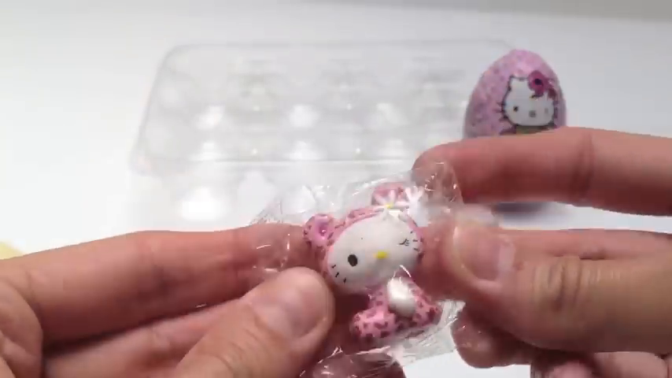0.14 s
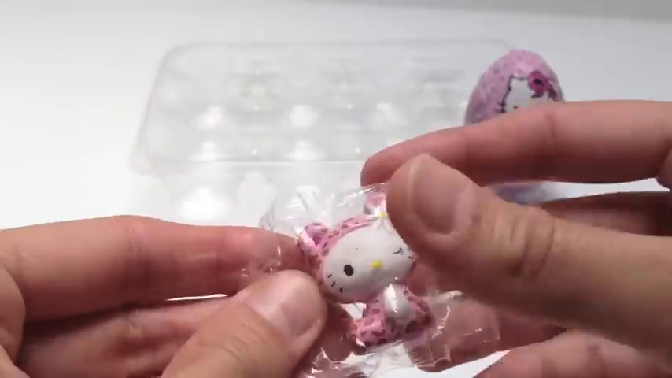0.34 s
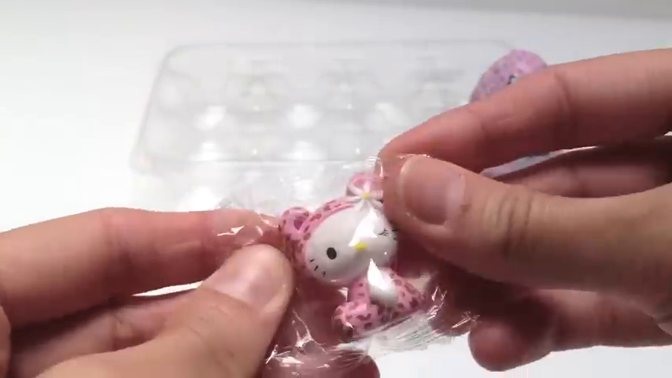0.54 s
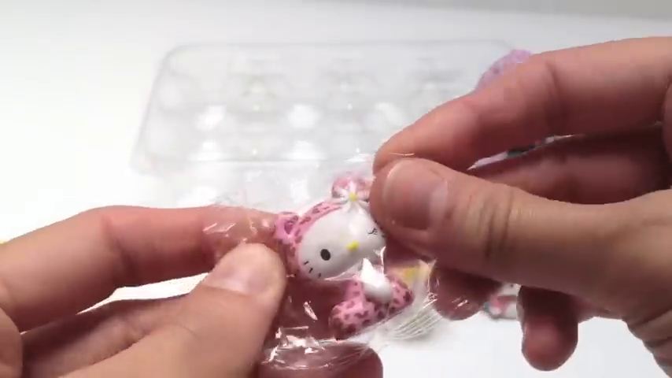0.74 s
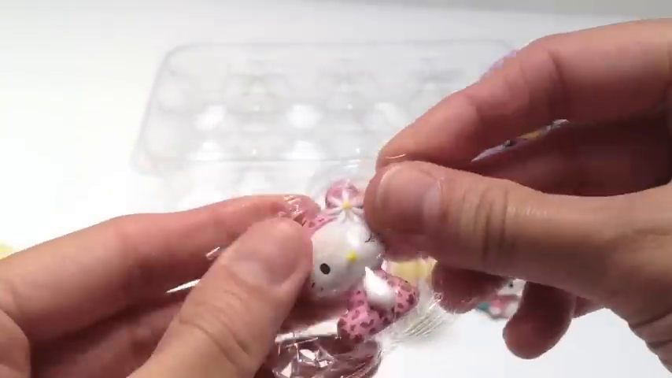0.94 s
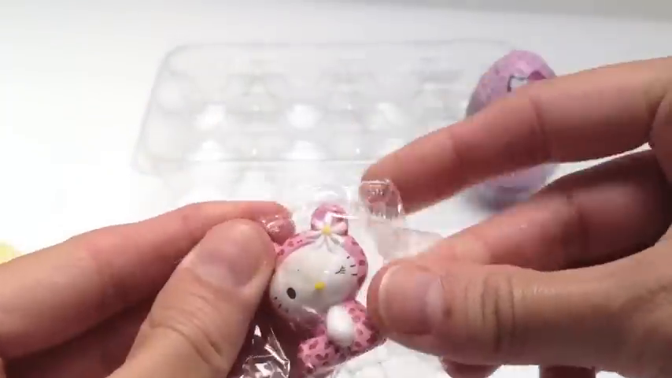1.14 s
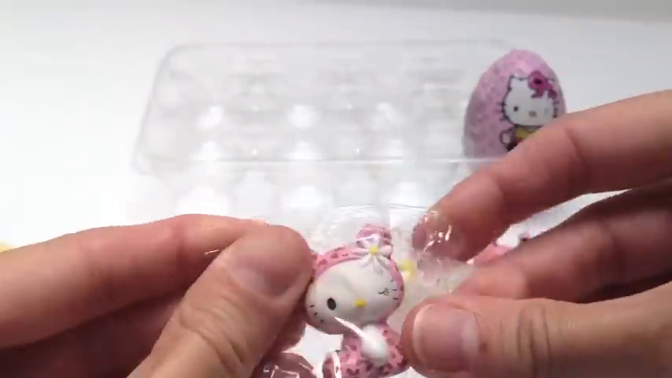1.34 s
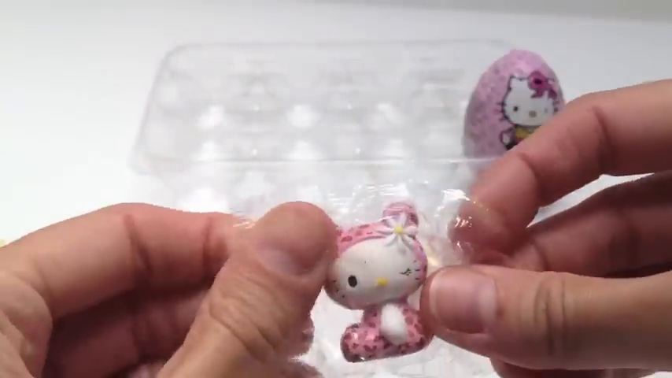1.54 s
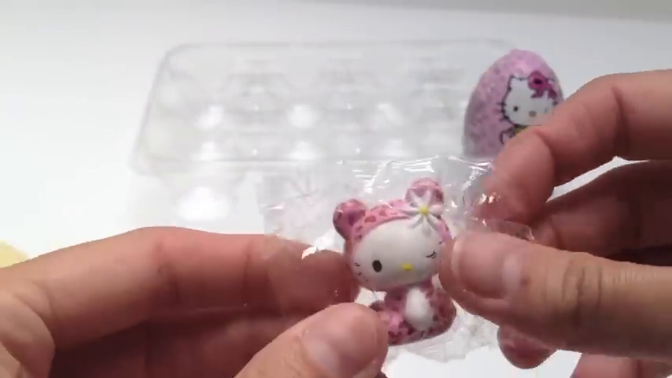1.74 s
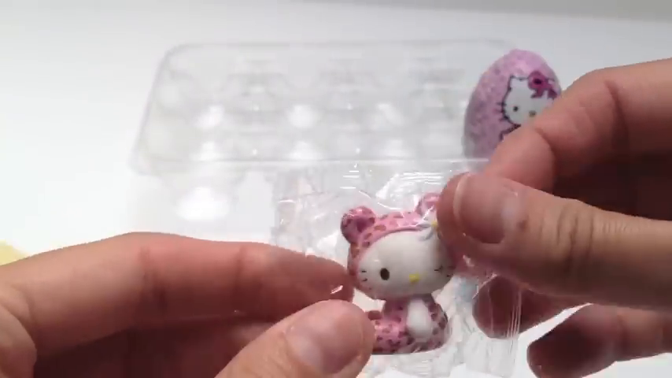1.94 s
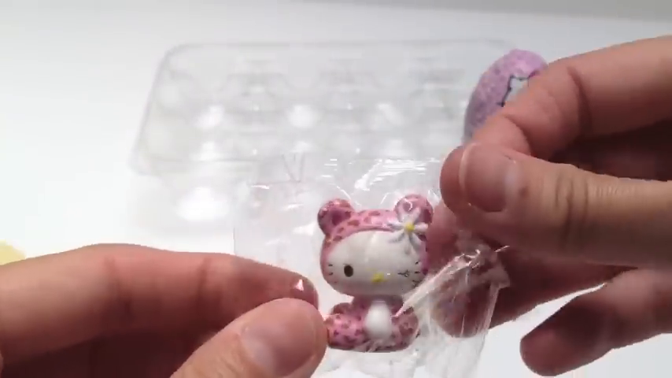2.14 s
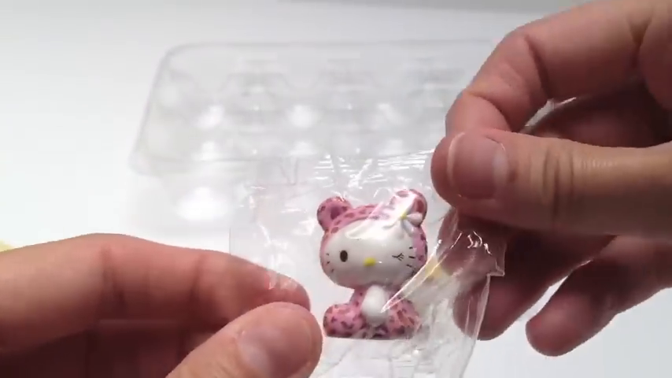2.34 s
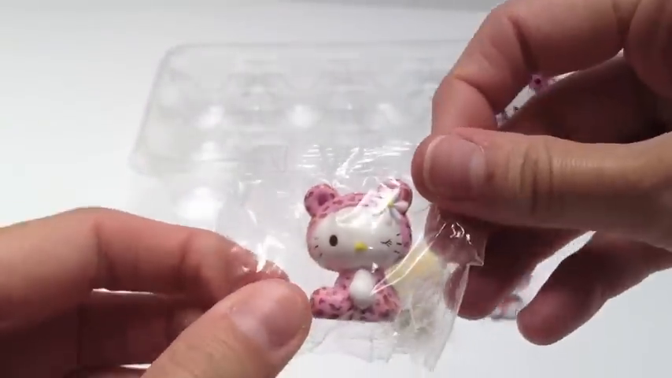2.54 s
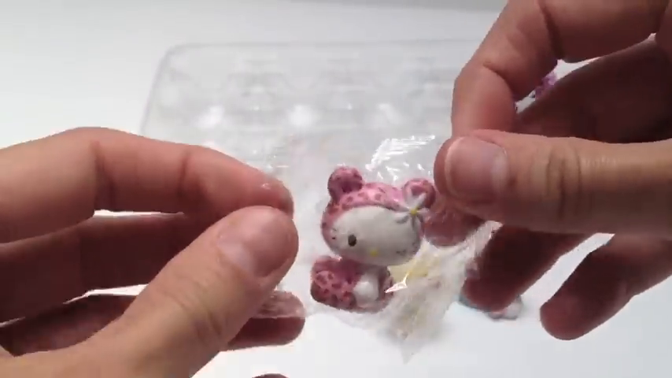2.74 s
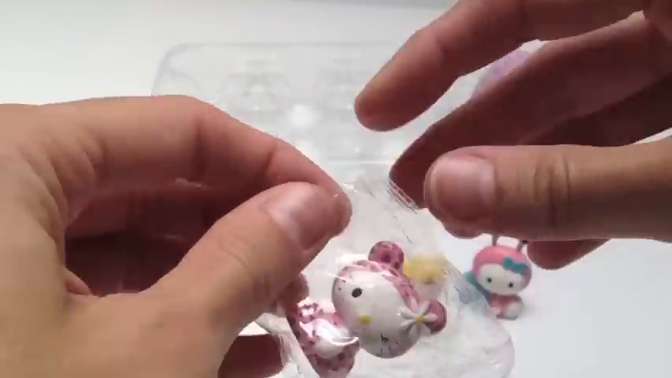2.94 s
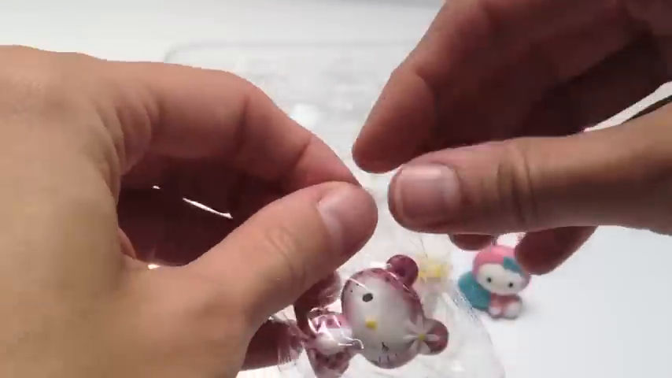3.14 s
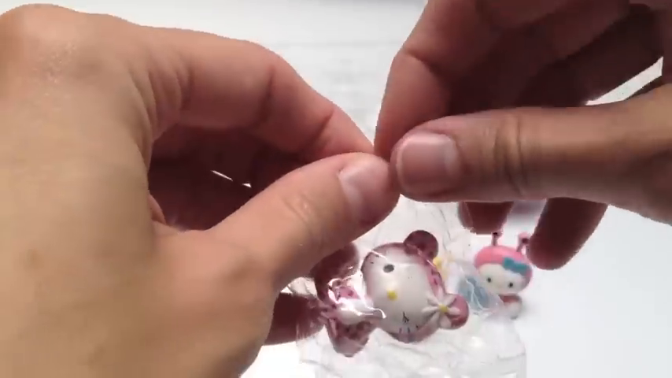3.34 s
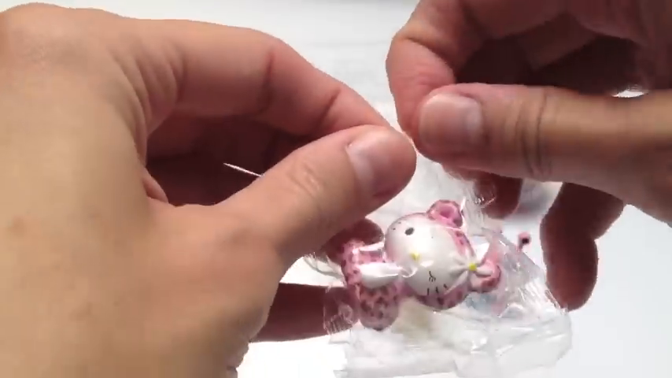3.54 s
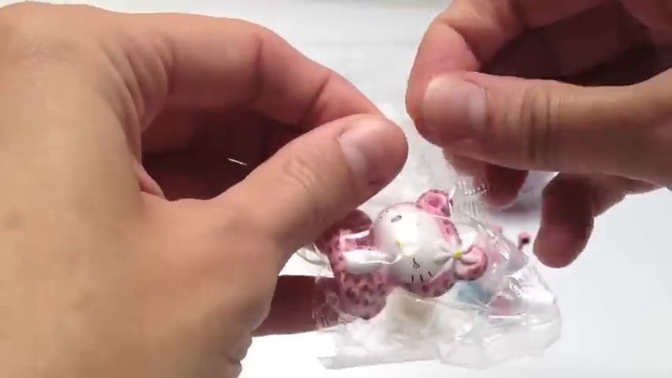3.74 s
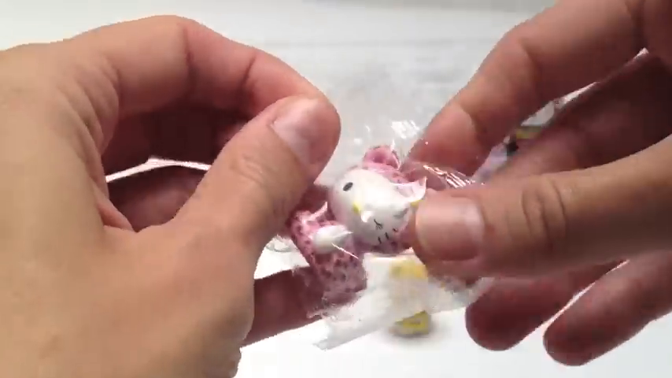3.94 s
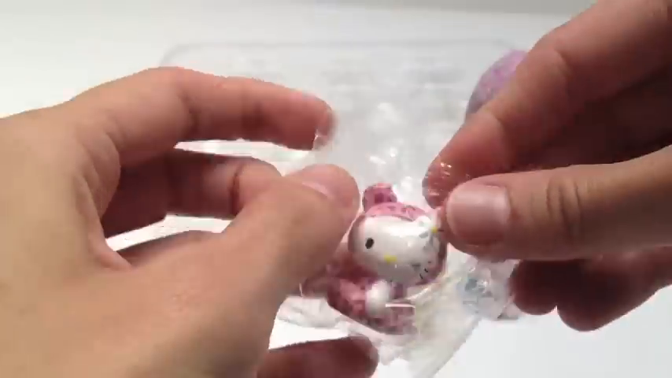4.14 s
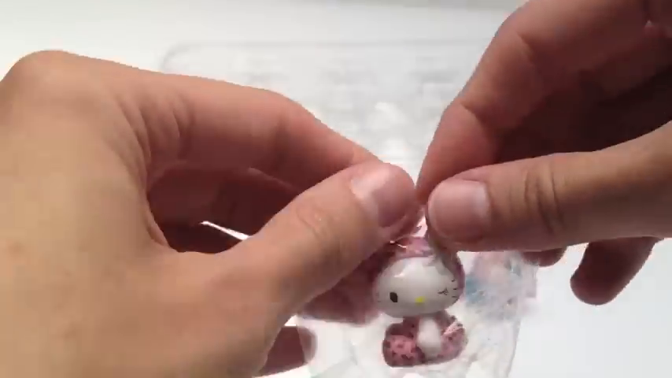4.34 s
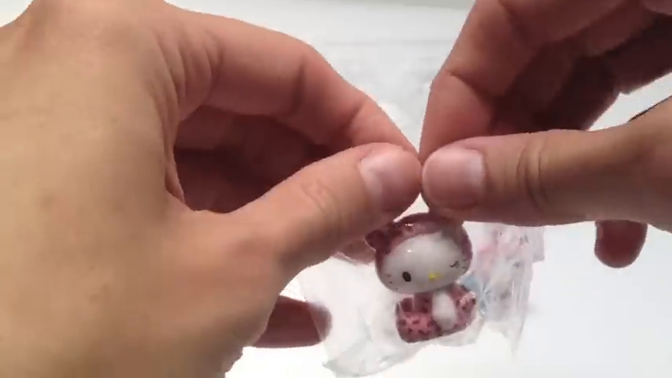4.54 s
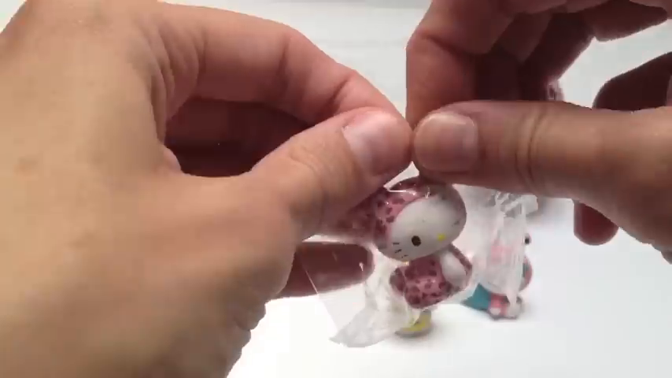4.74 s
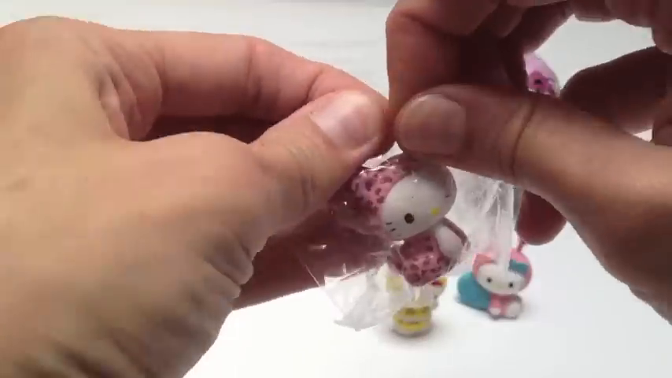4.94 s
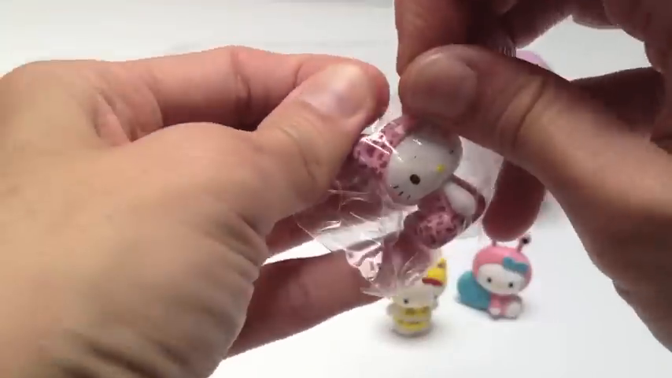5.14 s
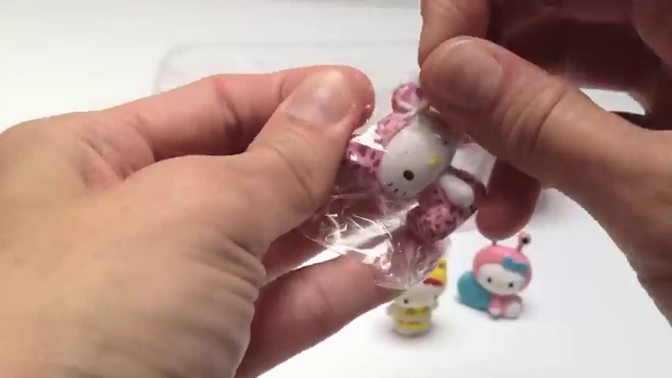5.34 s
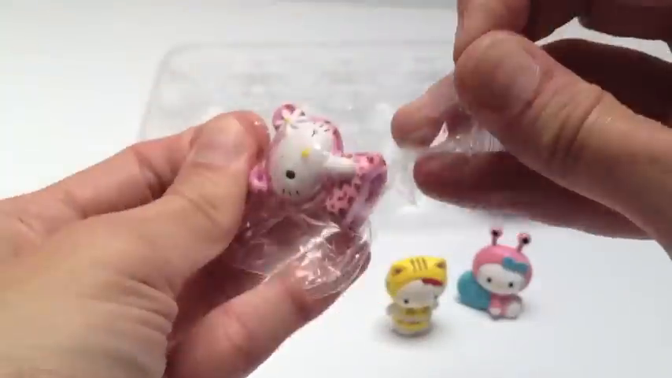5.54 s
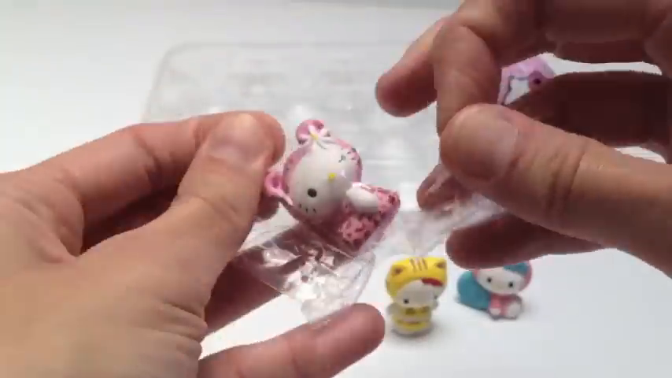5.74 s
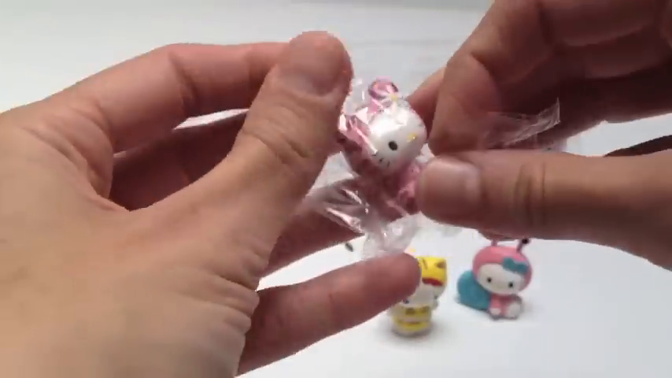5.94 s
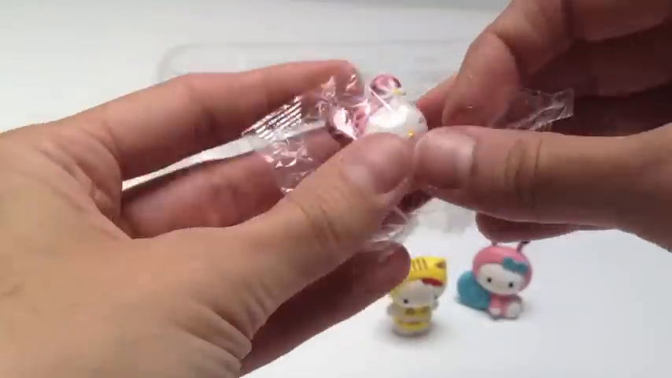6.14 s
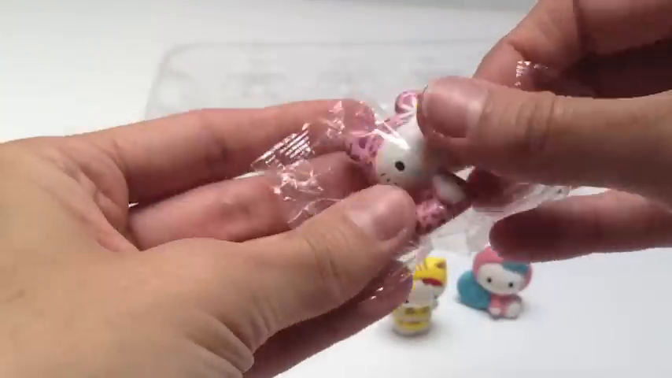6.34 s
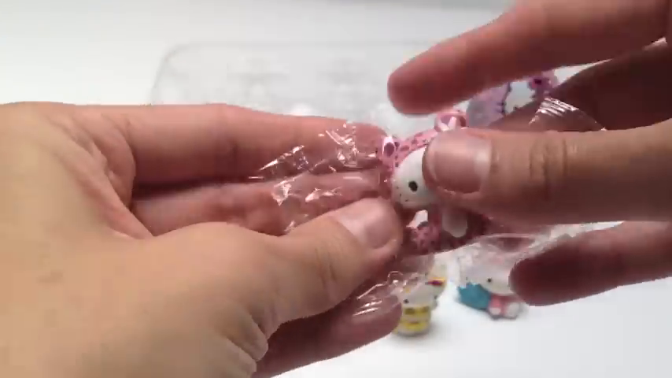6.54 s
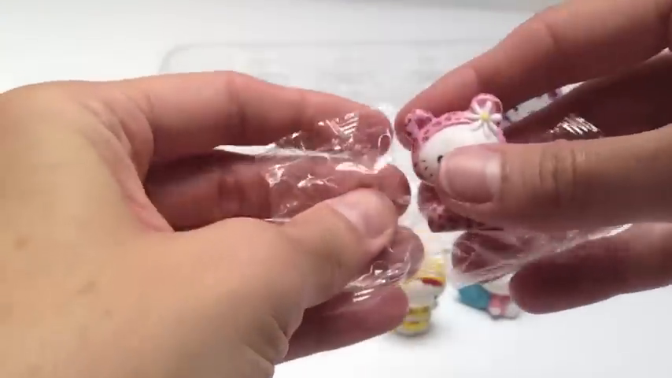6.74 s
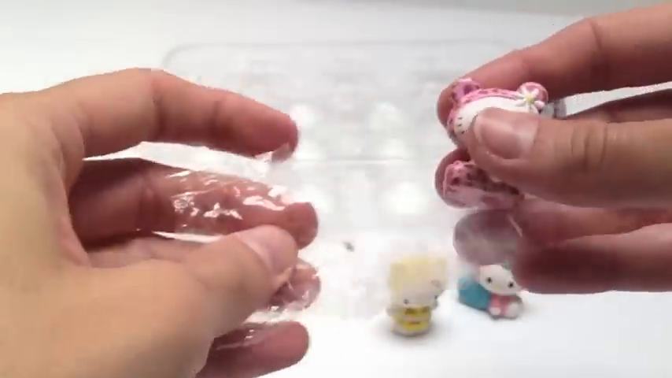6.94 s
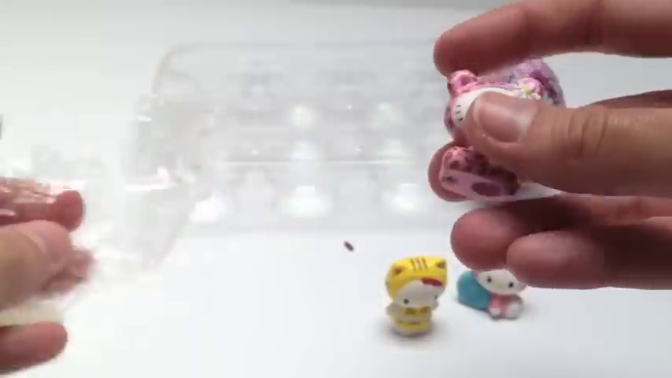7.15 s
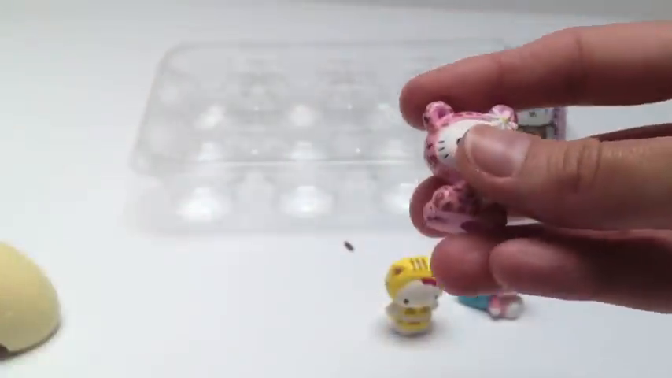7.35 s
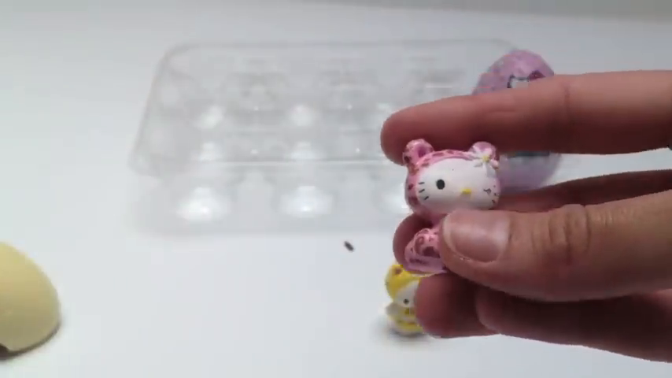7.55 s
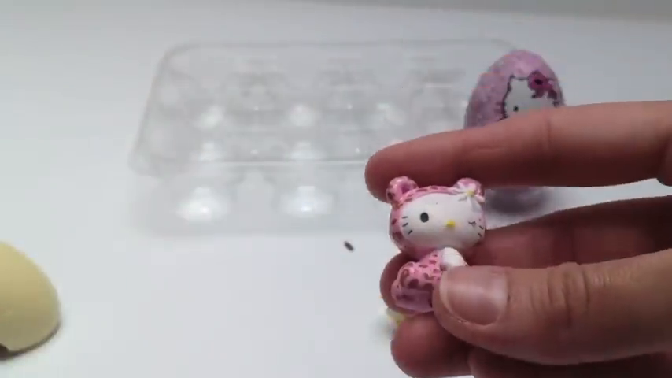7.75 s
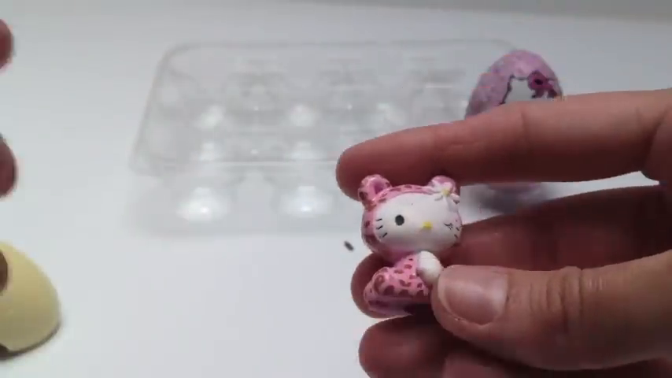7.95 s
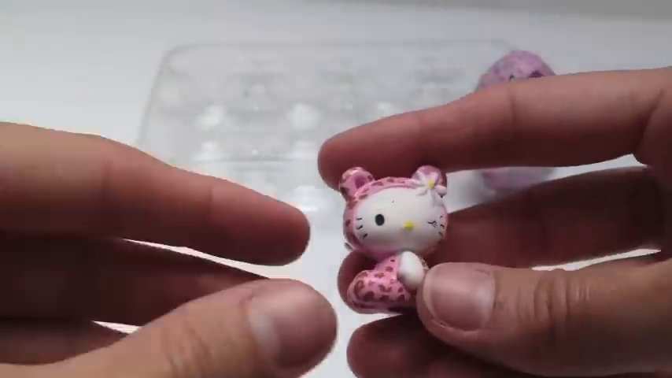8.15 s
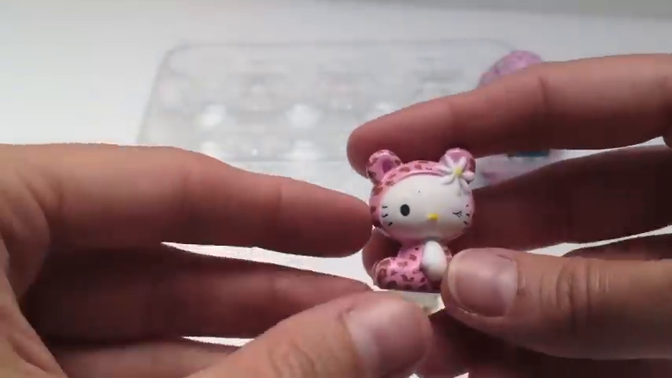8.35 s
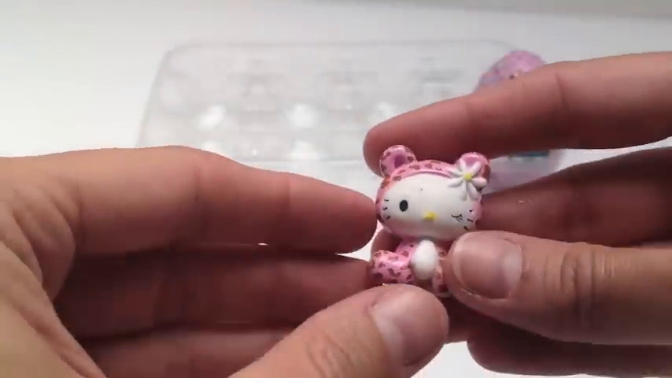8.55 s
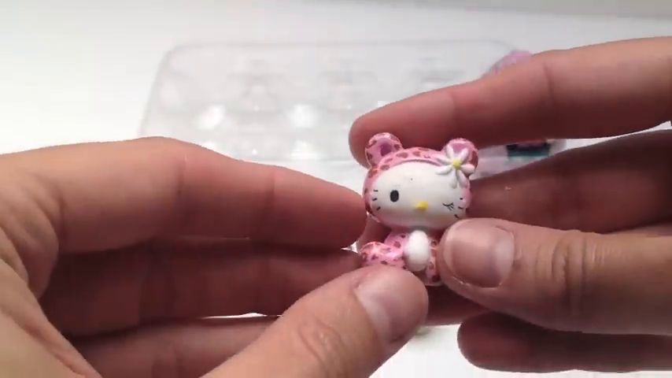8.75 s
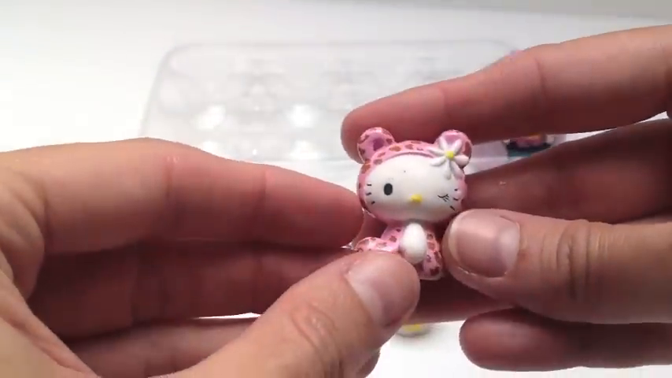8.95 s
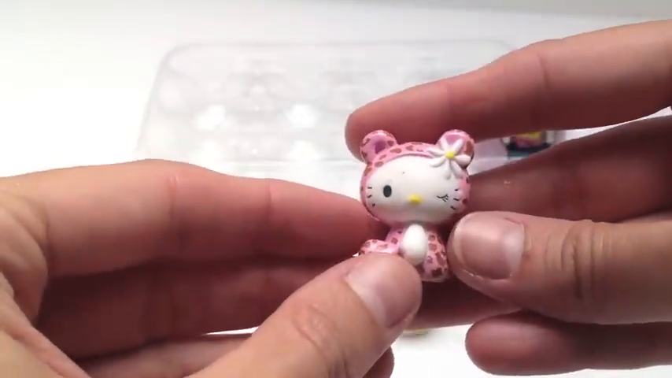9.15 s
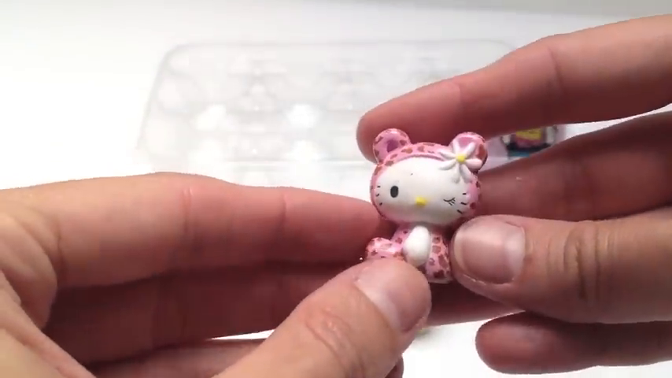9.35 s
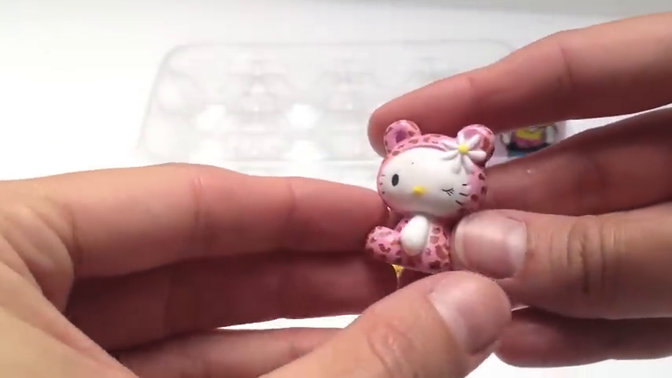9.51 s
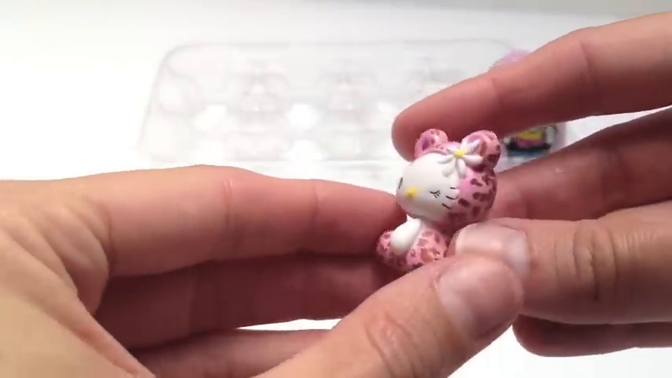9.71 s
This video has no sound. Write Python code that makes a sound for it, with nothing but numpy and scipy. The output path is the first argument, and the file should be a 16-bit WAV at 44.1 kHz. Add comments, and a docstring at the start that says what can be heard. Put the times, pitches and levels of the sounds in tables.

```python
"""A low wavering hum, hiss and faint whistle fill a quiet room throughout, as filtered noise and a sine.
From the start, fingers tear open a thin clear plastic bag around a small figure, close to a microphone.
Film creases, as struck resonances, make a dense fine crackle with noise rustle, and sharp snaps over it.
From 7.6 s the dropped bag brushes the table in soft scuffs of fading noise; the room sound remains."""
import sys
import numpy as np
from scipy import signal
from scipy.fft import rfft, irfft
from scipy.io import wavfile

SR = 44100
rng = np.random.default_rng(int(sys.argv[2]) if len(sys.argv) > 2 else 0)


def unload_audio(sound):
    """Save the sound as a 16-bit wav file, at the path given as the first command line argument."""
    columns = np.transpose(np.atleast_2d(sound))
    # keep every value between -1 and 1, then stretch to whole-number steps
    steps = np.round(np.clip(columns, -1, 1) * 32767)
    wavfile.write(sys.argv[1], SR, steps.astype(np.int16))


N = 435708

# Steady fumbling of the fingers on the film. Each row: time in seconds, crackle level in dB.
HANDLING = [(0.0, -51.5), (0.37, -64), (0.9, -53.5), (1.1, -51), (1.9, -48), (2.43, -53.5), (2.53, -68.5),
            (3.28, -65.5), (3.8, -56), (4.43, -65), (4.75, -52), (6.05, -57.5), (6.67, -59), (7.04, -53),
            (7.1, -71.5), (7.603, -69)]
# Film as the microphone colours it. Each row: frequency in Hz, gain in dB.
FILM = [(180, -54.5), (500, -16.5), (720, -5), (1400, -5.5), (1800, -2.5), (3500, -3), (5400, -8.5),
        (7600, -3.5), (9400, -12), (11500, -3), (14300, -1)]

SIZE = 512  # samples per crease
CRACKLE_PER_S = 350
LENGTH_SPREAD, TREBLE_SPREAD_DB = 0.4, 4  # how much creases differ: log of duration, treble in dB


def undb(db):
    """Amplitude ratio from decibels: 20 dB is a factor of ten."""
    return 10 ** (np.asarray(db) / 20)


def level(x, db):
    """Scale a signal to an RMS level in dB."""
    return x * undb(db) / np.sqrt(np.mean(x ** 2))


def spectrum(table, size):
    """Transfer-function magnitude: a (Hz, dB) table interpolated over log frequency on transform bins."""
    hz, db = np.transpose(table)
    bins_hz = np.fft.rfftfreq(size, 1 / SR) + 1
    return undb(np.interp(np.log(bins_hz), np.log(hz), db))


def causal(gain):
    """Minimum phase by the folded cepstrum: the filter rings only after it is struck."""
    cepstrum = irfft(np.log(gain))
    half = len(cepstrum) // 2
    folded = np.r_[cepstrum[0], 2 * cepstrum[1:half], cepstrum[half], np.zeros(half - 1)]
    return np.exp(rfft(folded))


def curve(table, t):
    """Linear interpolation of each column against the times in the first."""
    s, *columns = np.transpose(table)
    return [np.interp(t, s, column) for column in columns]


def halves(f):
    """Band splitting: the microphone's treble dip parts the sound into body and sizzle."""
    body_gain = 1 / (1 + (f / 9000) ** 10)
    sizzle_gain = 1 / (1 + (10800 / f) ** 10)
    return body_gain, sizzle_gain


def room():
    """Stationary noise and narrow bands superpose with a pure tone; a slow gain swells the bass."""
    # Hiss spectrum. Each row: frequency in Hz, relative density in dB per Hz.
    hiss_colour = [(90, -32), (122, -13), (235, -9), (340, -10), (590, -20), (1000, -15.5), (1400, -20.5),
                   (1750, -18), (2100, -25), (6000, -30.5), (9600, -37.5), (11500, -35.5), (14000, -27)]
    # Wavering hum. Each row: centre in Hz, width at half amplitude in Hz, level before the swell in dB.
    hum_bands = [(207.6, 7.3, -78.5), (239.5, 14, -72), (337.9, 9, -78.5)]
    # Thin steady tone. Each row: frequency in Hz, RMS level in dB.
    whistle = [(11601, -90)]
    # Low room sound swelling while arms move. Each row: time in seconds, gain in dB.
    rumble = [(0, 0.5), (3.8, 1), (4.6, 7.5), (5.4, 4), (7.8, 2.5), (8.2, -1.5)]

    t, f = np.arange(N) / SR, np.fft.rfftfreq(N, 1 / SR)
    hiss = irfft(rfft(rng.standard_normal(N)) * spectrum(hiss_colour, N), N)
    noise = rfft(level(hiss, -65))  # dB before the swell
    for hz, width_hz, db in hum_bands:
        band = rfft(rng.standard_normal(N)) / (1 + (2 * (f - hz) / width_hz) ** 2)
        noise = noise + rfft(level(irfft(band, N), db))
    low = 1 / (1 + (f / 260) ** 4)
    swell = undb(curve(rumble, t)[0])
    tones = sum(undb(db) * np.sqrt(2) * np.sin(2 * np.pi * hz * t) for hz, db in whistle)
    return irfft(noise * low, N) * swell + irfft(noise * (1 - low), N) + tones


def buckle(ring_hz, treble_db, q=3.5, skirt_db=-10, shiver_ms=1.0):
    """Impulse-excited resonance, a row per crease: a jolt and short shiver ring the film; body peak 1."""
    t = np.arange(SIZE) / SR
    chance = rng.standard_normal((len(ring_hz), SIZE + 1))
    decay_s = shiver_ms / 1000 * np.exp(LENGTH_SPREAD * chance[:, -1:])
    push = chance[:, :SIZE] * np.exp(-t / decay_s)
    push[:, 0] += 3 * np.sign(push[:, 0])  # first blow against the shiver
    sound = rfft(push) * causal(spectrum(FILM, SIZE))

    f = np.fft.rfftfreq(SIZE, 1 / SR) + 1
    body_gain, sizzle_gain = halves(f)
    ratio = f / ring_hz[:, None]
    resonance = 1 / (1 + 1j * q * (ratio - 1 / ratio))
    skirt = undb(skirt_db + 0.14 * np.minimum(treble_db, 0))[:, None]  # dull creases ring purer
    body = irfft(sound * body_gain * (resonance + skirt))
    sizzle = irfft(sound * sizzle_gain)
    body = body / np.abs(body).max(axis=1, keepdims=True)
    sizzle = sizzle / np.abs(sizzle).max(axis=1, keepdims=True)
    return body + undb(treble_db)[:, None] * sizzle


def place(rows, s):
    """Linear superposition: add each row to the time line at its start in seconds."""
    out = np.zeros(N + SIZE)
    starts = (s * SR).astype(int)
    np.add.at(out, starts[:, None] + np.arange(SIZE), rows)
    return out[:N]


def effort(t):
    """Power addition: squeezes add to steady fumbling, giving crackle level and relative treble in dB."""
    # Squeezes and pulls that crumple the film. Each row: time of the strongest crackle in seconds,
    # level in dB, seconds to build by 10 dB (zero or less: at once), seconds to fade by 10 dB,
    # treble relative to the body in dB.
    squeezes = [(0.092, -40, 0.08, 0.07, 2.5), (0.244, -43.5, -0.1, 0.1, 1), (0.5, -45, 0.1, 0.2, 3),
                (1.15, -46.5, 0.27, 0.15, 6), (1.265, -48, 0, 0.23, -1), (2.175, -42.5, 0.06, 0.11, -14),
                (2.241, -38, 0.11, 0.02, 4.5), (2.322, -40.5, 0, 0.04, -2), (2.79, -46, 0.17, 0.11, -0.5),
                (3.186, -42.5, 0.06, 0.0435, -11.5), (3.55, -46.5, 0.09, 0.03, 3.5),
                (4.052, -48.5, 0.14, 0.23, -1), (4.886, -45, 0.0746, 0.15, -23),
                (5.421, -34.5, 0.0153, 0.06, 4), (5.474, -39.5, 0.0458, 0.07, 6),
                (5.694, -48.5, 0.07, 0.3, -1.5), (6.53, -47, 0.18, 0.17, 6.5),
                (6.74, -49.5, -0.05, 0.38, -5)]

    body = undb(2 * curve(HANDLING, t)[0])  # doubled dB give power
    treble = body  # steady fumbling has even treble
    for s, peak_db, build_s, fade_s, treble_db in squeezes:
        slope_s = np.maximum(np.where(t < s, build_s, fade_s), 1 / CRACKLE_PER_S)
        power = undb(2 * peak_db - 20 * np.abs(t - s) / slope_s)
        body, treble = body + power, treble + power * undb(2 * treble_db)
    return 10 * np.log10(body), 10 * np.log10(treble / body)


def crackle():
    """Granular superposition: bunches of small creases, few large and many tiny, over rustling skin."""
    bunch = 6  # creases that share size and pitch offsets
    s = np.arange(0, HANDLING[-1][0], 1 / CRACKLE_PER_S)
    count = len(s)
    when, size = rng.random(count), rng.exponential(size=count)
    pitch, bright = rng.standard_normal((2, count))
    panel, push = np.repeat(rng.standard_normal((2, count)), bunch, axis=1)[:, :count]
    s = s + when / CRACKLE_PER_S
    db, treble_db = effort(s)
    ring_hz = np.clip(2600 * np.exp(0.34 * (pitch + panel)), 600, 8000)
    rows = buckle(ring_hz, treble_db + TREBLE_SPREAD_DB * bright)
    size_db = 6.5 * np.minimum(size, 2.7)  # capped, as the largest are the snaps
    rows = rows * undb(size_db + 2.8 * push)[:, None]
    rows = rows / np.sqrt(np.mean(place(rows, s) ** 2))

    t = np.arange(N) / SR
    db_now, treble_now = effort(t)
    noise = rfft(rng.standard_normal(N)) * spectrum(FILM, N)
    bands = halves(np.fft.rfftfreq(N, 1 / SR) + 1)
    body, sizzle = (level(irfft(noise * gain, N), 0) for gain in bands)
    # Rustle against crackle: -8 dB at a crackle of -48.5 dB, growing with effort, flickering by bunch.
    rustle_db = -8 + 0.18 * (db_now + 48.5) + 2.2 * np.interp(t, s, push)
    rustle = (body + sizzle * undb(treble_now)) * undb(db_now + rustle_db) * (t < s[-1])
    return place(rows * undb(db)[:, None], s) + rustle


def snaps(after_db=-16, after_s=0.01, count=3):
    """Buckling instability: each loud crease sets off a few, mostly weaker, of other pitch soon after."""
    # Creases that buckle audibly. Each row: start in seconds, peak level of the body in dB,
    # ring frequency in Hz, treble relative to the ring in dB.
    loud_creases = [(0.0672, -17.5, 2400, -30), (0.094, -20.5, 4440, 12.5), (0.1095, -18, 7650, 4),
                    (0.256, -25, 2220, -10), (0.3276, -21, 3320, 5.5), (0.444, -22.5, 3040, -9),
                    (0.4815, -21.5, 2950, 0), (0.5856, -23, 1930, 13.5), (0.6024, -11.5, 4800, 5.5),
                    (0.7584, -26.5, 3820, 4), (0.818, -22, 7100, 9.5), (0.9094, -18.5, 2010, 3),
                    (0.946, -20, 2870, 1), (1.015, -24, 4520, -10), (1.0908, -20.5, 1680, -3),
                    (1.1089, -22, 3040, 6), (1.1459, -17, 3030, 3.5), (1.154, -25, 4000, -17),
                    (1.1724, -23, 6600, -1), (1.198, -27.5, 1780, 7), (1.234, -23.5, 1850, -23),
                    (1.251, -17, 3930, -2), (1.2728, -17, 3060, -2), (1.346, -25.5, 1940, 7),
                    (1.3863, -25.5, 3700, 0), (1.445, -20, 4400, 0.5), (1.4796, -22, 3150, 7.5),
                    (1.551, -31, 2670, 12), (1.594, -33, 4540, 13.5), (1.6325, -25, 4600, -1),
                    (1.664, -23, 1480, 3), (1.71, -21, 6850, 1), (1.827, -25, 7000, 9),
                    (1.9236, -22, 4350, -12), (1.9598, -14, 2600, -3), (2.0948, -21, 2000, 3.5),
                    (2.1634, -17, 2300, -13), (2.1842, -23, 1410, -12), (2.1883, -25, 3530, -8),
                    (2.2258, -20.5, 2930, 8), (2.2974, -27, 1780, 9), (2.312, -26.5, 1590, -30),
                    (2.32, -20, 5830, 9.5), (2.327, -24.5, 2770, 11), (2.409, -26.5, 2210, 5.5),
                    (2.5703, -22.5, 2680, 3), (2.6527, -32, 4800, 16), (2.806, -29, 2450, -1),
                    (2.8615, -31.5, 1080, -13), (2.961, -32.5, 8200, 2), (3.196, -27, 1530, -6),
                    (3.3294, -23.5, 3280, -22), (3.453, -30, 2410, 6), (3.5, -30.5, 2450, 11),
                    (3.6925, -30, 2480, 13), (3.7, -30, 2550, 12), (3.9333, -25.5, 3700, -11),
                    (3.986, -22, 3300, -9), (4.0205, -25, 2330, 4), (4.046, -22.5, 2730, 4.5),
                    (4.4433, -35, 2800, -10), (4.5786, -30, 890, 7), (4.6013, -27, 7100, 9.5),
                    (4.618, -25.5, 1460, 2), (4.6427, -26.5, 780, 1), (4.6902, -25, 2900, -2),
                    (4.7482, -22, 2910, -5), (4.7525, -19.5, 1790, -4), (4.8307, -27, 3760, 3),
                    (4.846, -25, 3200, -24), (4.8767, -18.5, 7800, -6), (5.0031, -26.5, 3080, -9),
                    (5.0863, -23.5, 3420, -2), (5.1163, -22, 2530, 1), (5.193, -15.5, 2120, -13),
                    (5.2276, -22, 2410, 1), (5.3455, -31.5, 8400, 15), (5.3655, -34, 6850, 7),
                    (5.417, -18.5, 7700, 6), (5.4498, -22, 4640, 11), (5.466, -28, 2350, -1),
                    (5.4775, -19.5, 3260, -25), (5.6033, -29, 1590, -2), (5.678, -21.5, 1490, -30),
                    (5.937, -31.5, 1720, -2), (6.077, -31.5, 4030, -29), (6.1674, -19.5, 4000, -4),
                    (6.2316, -31.5, 6800, 11), (6.2729, -29.5, 7800, 1), (6.336, -20.5, 7450, 6),
                    (6.3507, -25, 3400, 12), (6.3885, -23.5, 2410, 6), (6.3941, -28.5, 2500, 8),
                    (6.433, -32, 3460, 1), (6.5289, -31.5, 2680, 14), (6.6032, -31, 2370, 3),
                    (6.895, -22, 3200, 1), (6.949, -29.5, 2760, -16), (7.118, -36, 2440, -43),
                    (7.2636, -27, 3300, 2), (7.4039, -27, 1010, -1), (7.572, -35.5, 750, -2)]

    s, db, hz, treble_db = np.transpose(loud_creases)
    out = place(buckle(hz, treble_db) * undb(db)[:, None], s)
    for _ in range(count):
        wait = rng.exponential(size=len(s))
        pitch, size, bright = rng.standard_normal((3, len(s)))
        ring_hz = np.clip(hz * np.exp(0.4 * pitch), 600, 8000)
        rows = buckle(ring_hz, treble_db + TREBLE_SPREAD_DB * bright)
        neighbour_db = db + after_db + 3.4 * size - 7.3 * wait  # later ones are weaker
        out += place(rows * undb(neighbour_db)[:, None], s + 0.0042 + after_s * wait)
    return out


def echo(x):
    """Diffuse reverberation: table top and walls return a short, exponentially decaying noise tail."""
    echo_db, t60_s = -14, 0.068
    t = np.arange(SR // 2) / SR
    tail = rng.standard_normal(len(t)) * undb(-60 * t / t60_s) * np.minimum(t / 0.00074, 1)
    tail = signal.lfilter([1], [1, -0.3], tail)  # slightly dull
    return signal.fftconvolve(x, tail * undb(echo_db) / np.sqrt(np.sum(tail ** 2)))[:N]


def brushes(dull_hz=1200, dull=3.9):
    """Friction noise: the dropped bag makes dull scuffs with a quick swell and exponential decay."""
    # The bag brushes the table. Each row: start in seconds, level at the start of the decay in dB,
    # time to fade by 60 dB in seconds.
    scuffs = [(7.62, -49, 0.38), (7.739, -58, 1), (7.811, -52.5, 0.2)]

    t, f = np.arange(N) / SR, np.fft.rfftfreq(N, 1 / SR)
    hump = 1 + dull / (1 + (3 * np.log((f + 1) / dull_hz)) ** 2)
    colour = spectrum(FILM, N) / (1 + f / 9000) * hump
    hiss = level(irfft(rfft(rng.standard_normal(N)) * colour, N), 0)
    envelope = np.zeros(N)
    for s, db, t60_s in scuffs:
        since = np.maximum(t - s, 0)
        envelope += undb(db - 60 * since / t60_s) * np.minimum(since / 0.0014, 1)
    return hiss * envelope


def scene():
    """Superposition of direct film sound, its reverberation and the room, on one channel."""
    film = crackle() + snaps() + brushes()
    high_pass = signal.butter(1, 200, "high", fs=SR, output="sos")  # thin film moves no bass
    film = signal.sosfilt(high_pass, film)
    return (room() + film + echo(film))[None]


def record(dry, shelf_db=-27):
    """Band limiting: the top of the treble steps down, then a steep low-pass cuts it off."""
    shelf_hz, top_hz = 15330, 16500
    f = np.fft.rfftfreq(N, 1 / SR)
    stepped = irfft(rfft(dry) * np.where(f > shelf_hz, undb(shelf_db), 1), N)
    low_pass = signal.ellip(10, 0.2, 60, top_hz, fs=SR, output="sos")
    return signal.sosfilt(low_pass, stepped)


dry = scene()
out = record(dry)
unload_audio(out)
```